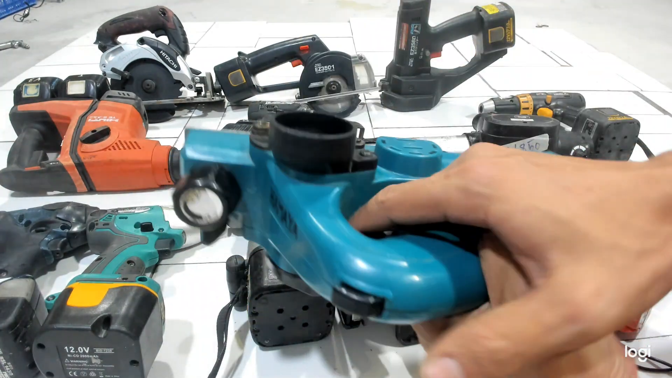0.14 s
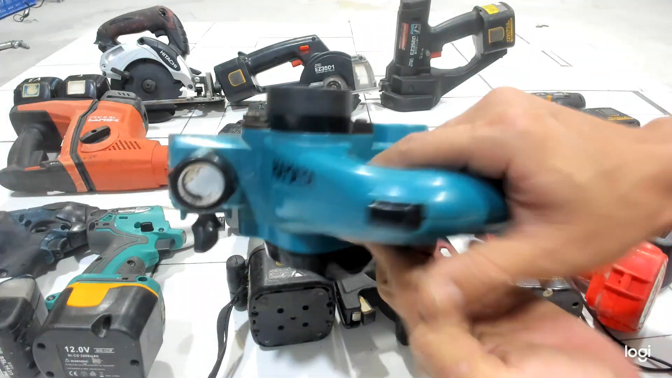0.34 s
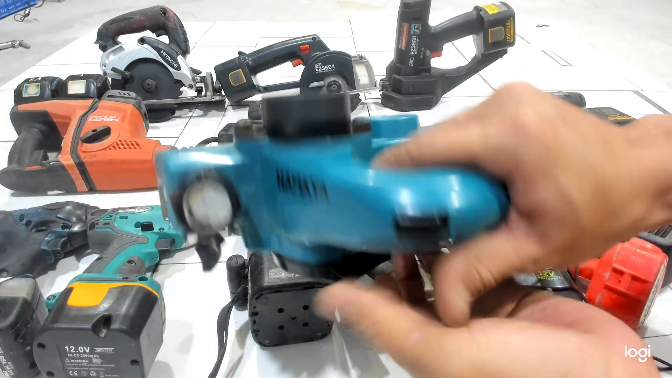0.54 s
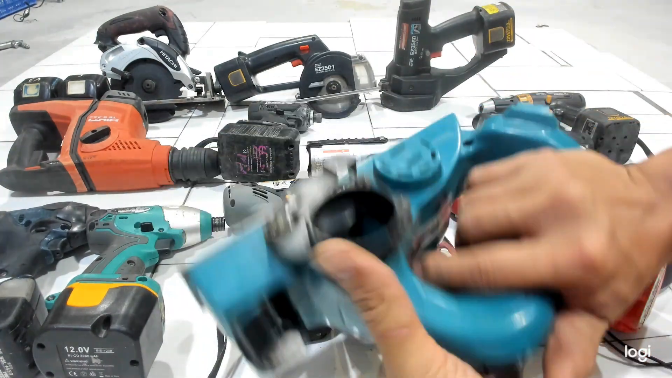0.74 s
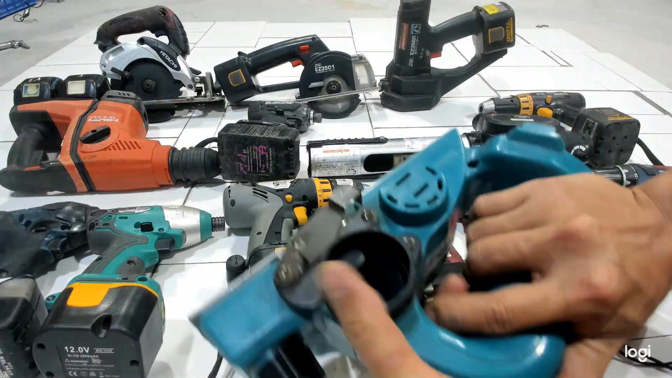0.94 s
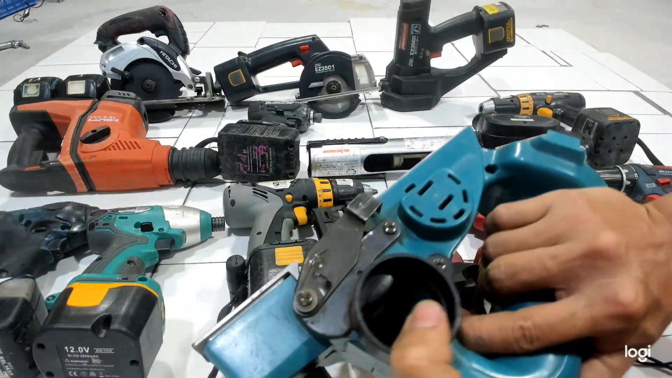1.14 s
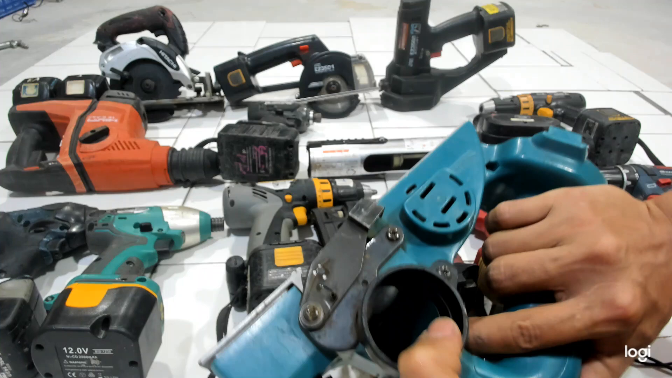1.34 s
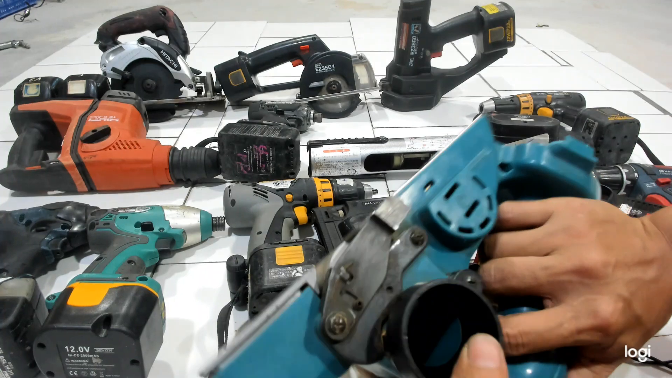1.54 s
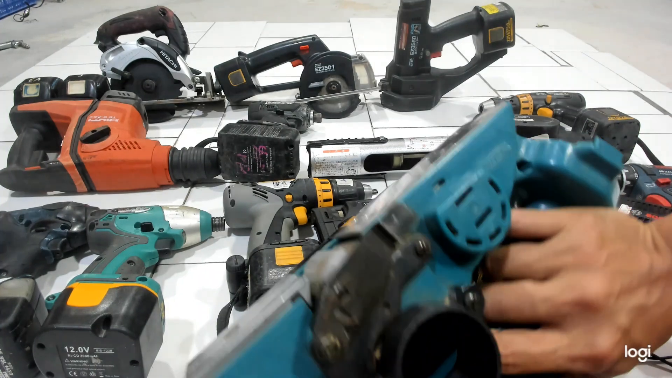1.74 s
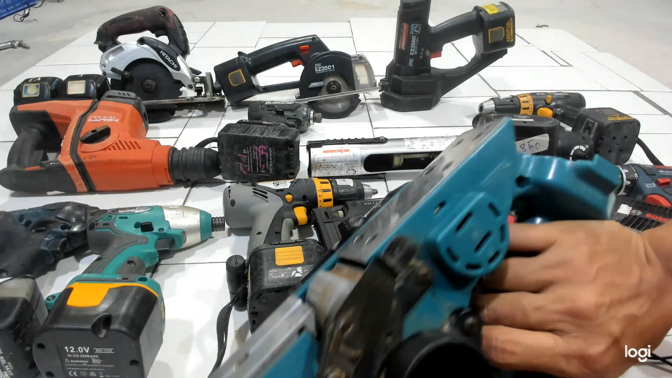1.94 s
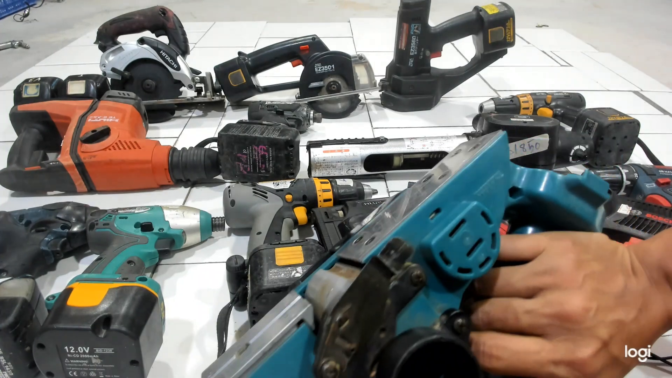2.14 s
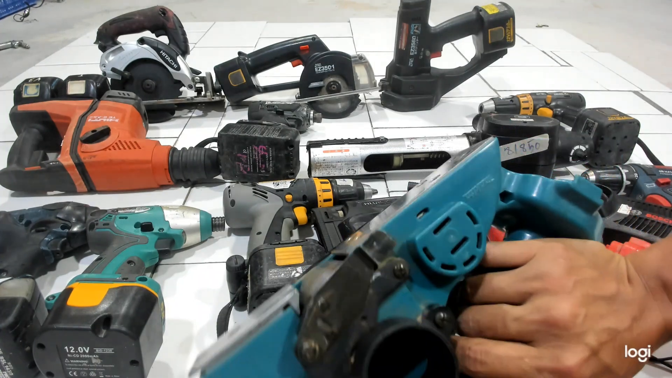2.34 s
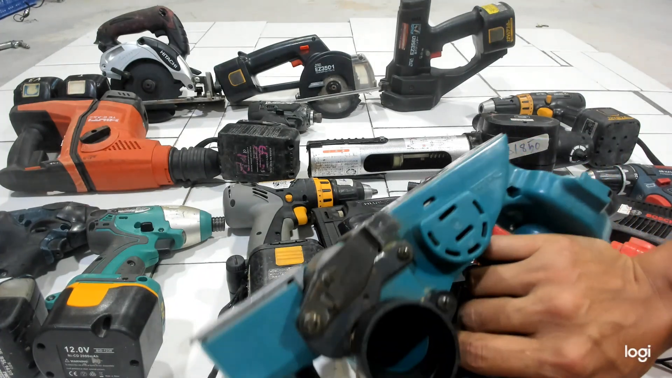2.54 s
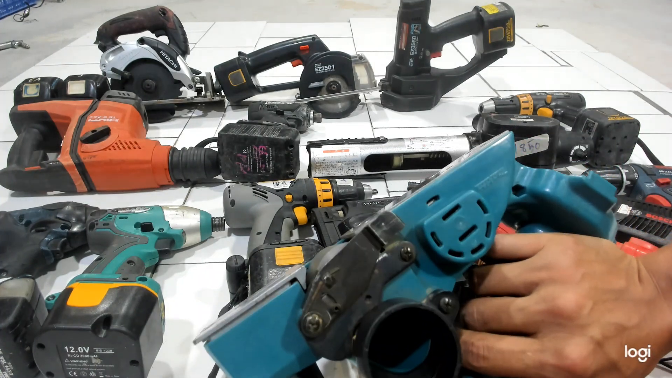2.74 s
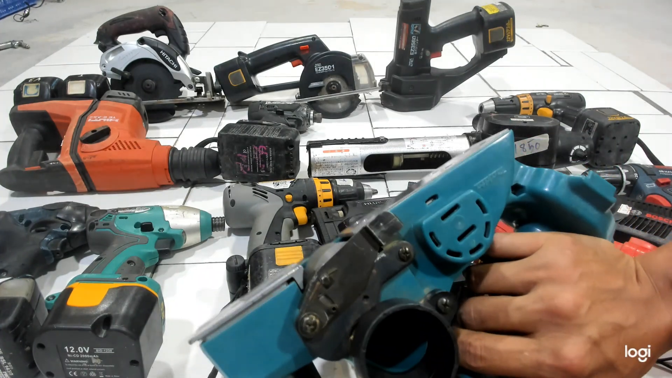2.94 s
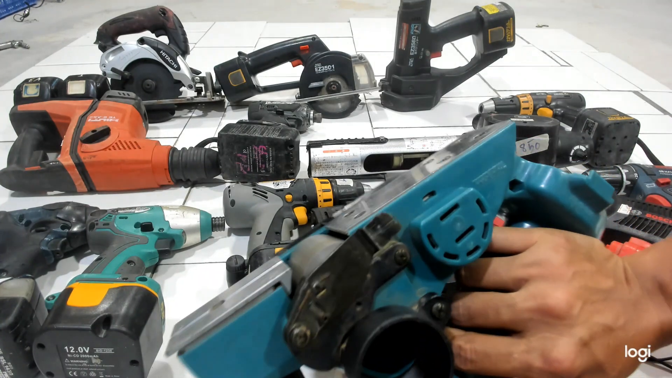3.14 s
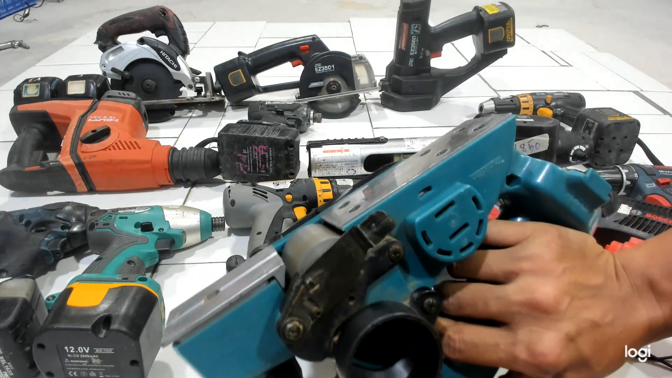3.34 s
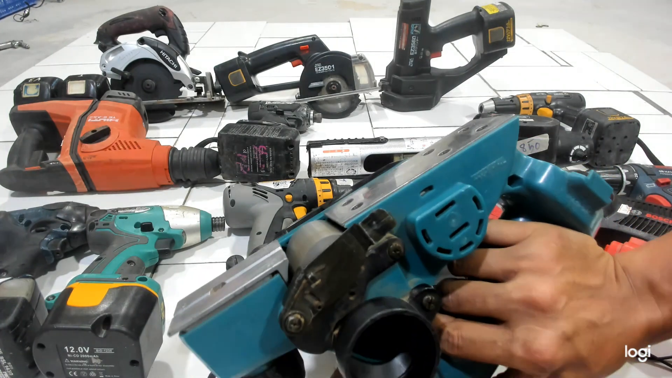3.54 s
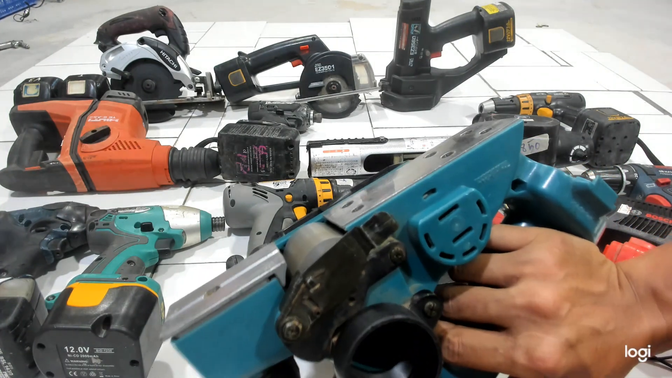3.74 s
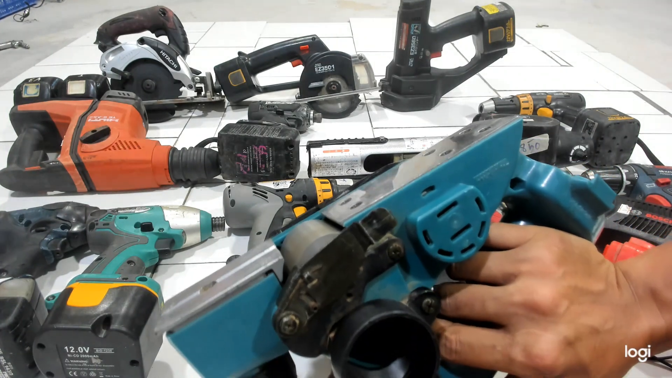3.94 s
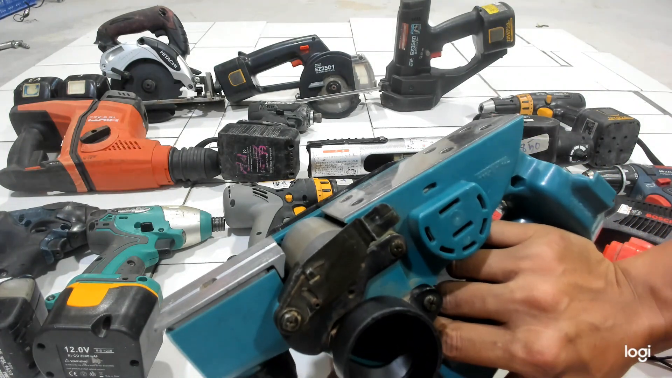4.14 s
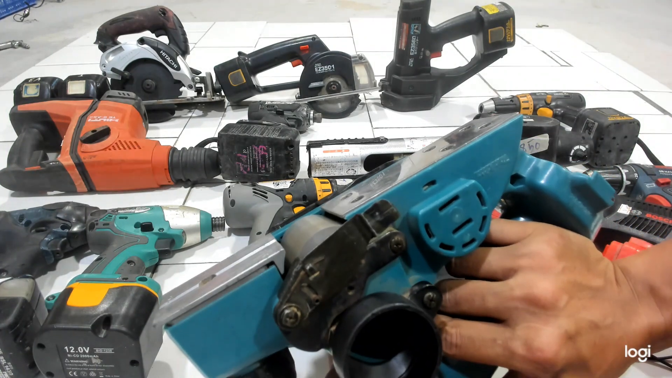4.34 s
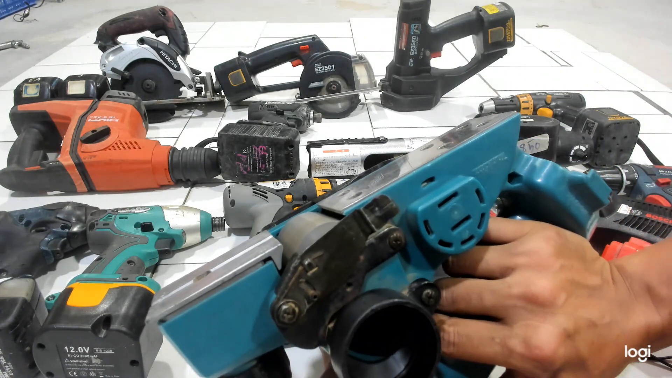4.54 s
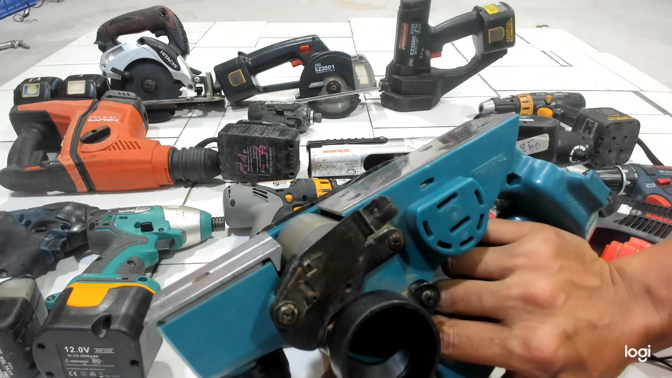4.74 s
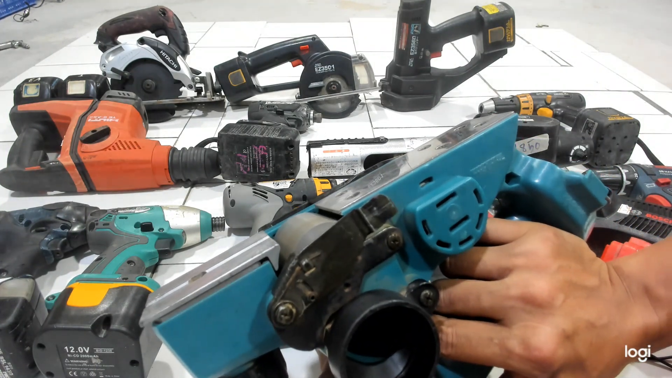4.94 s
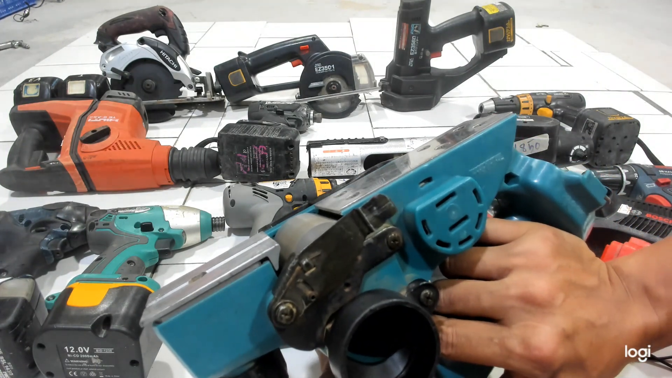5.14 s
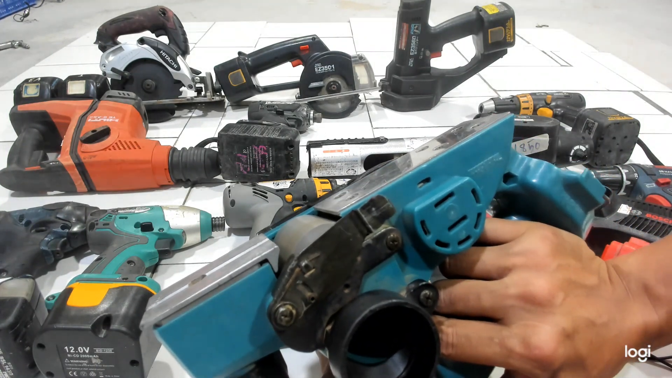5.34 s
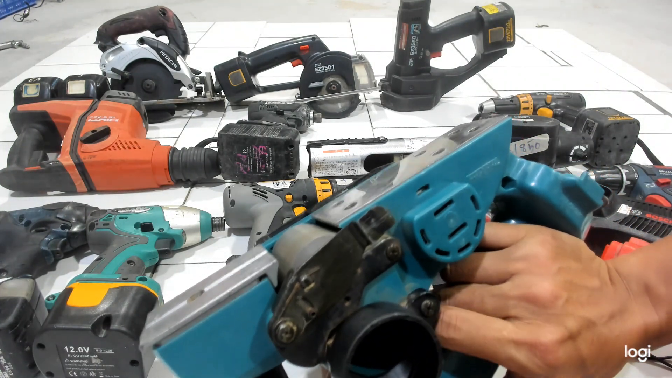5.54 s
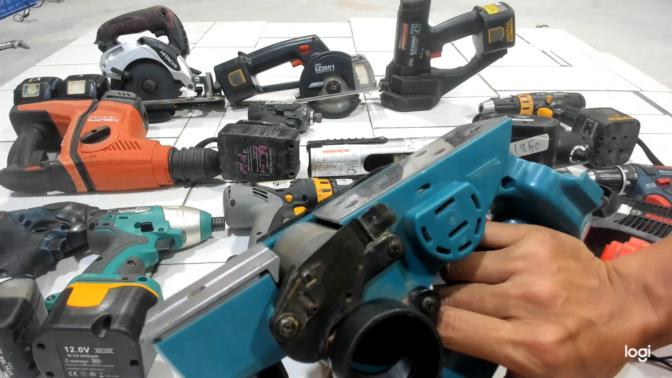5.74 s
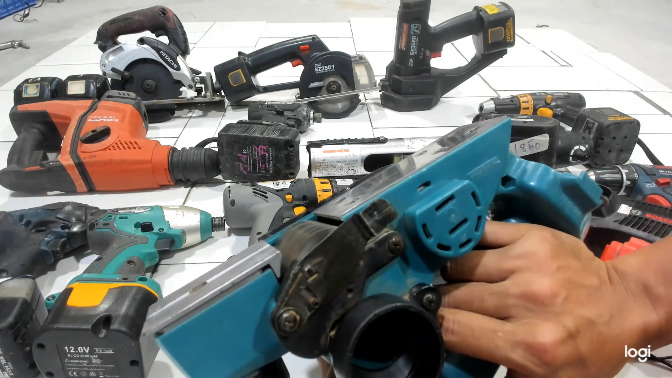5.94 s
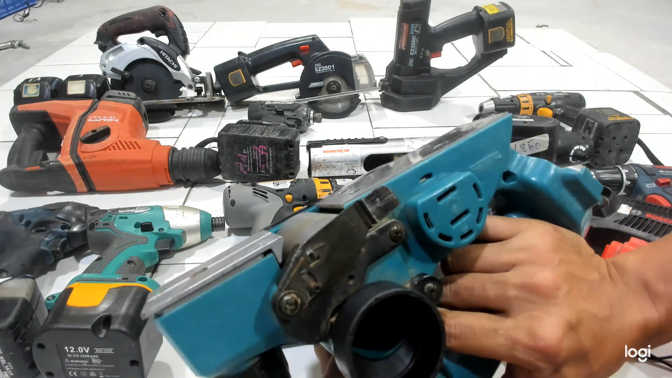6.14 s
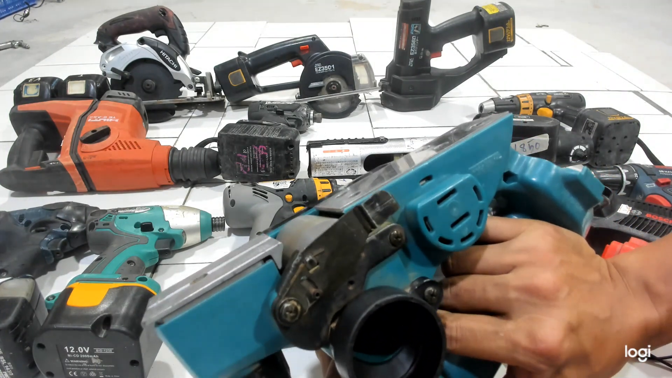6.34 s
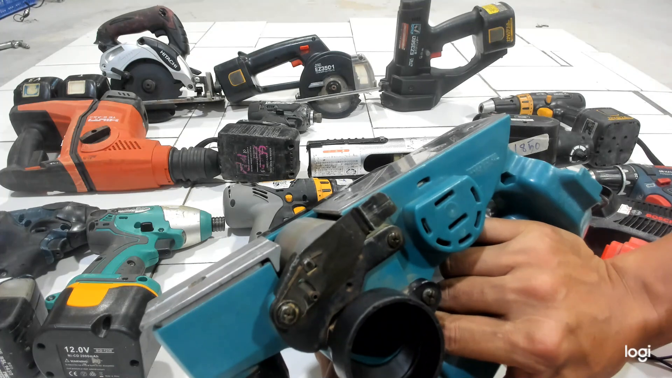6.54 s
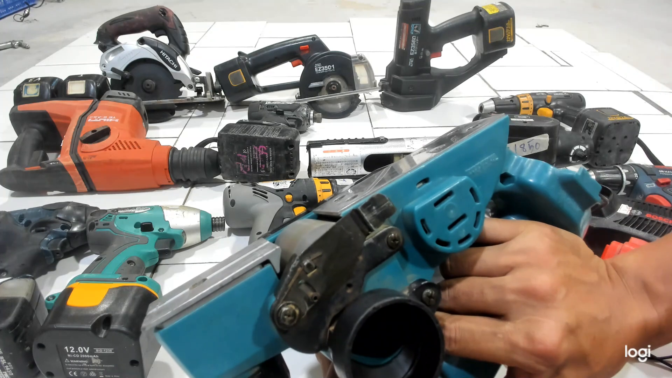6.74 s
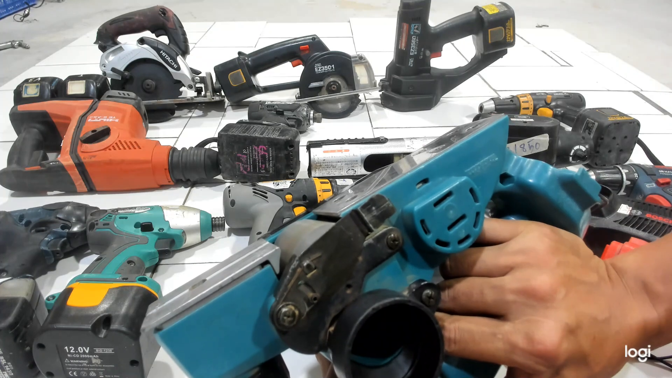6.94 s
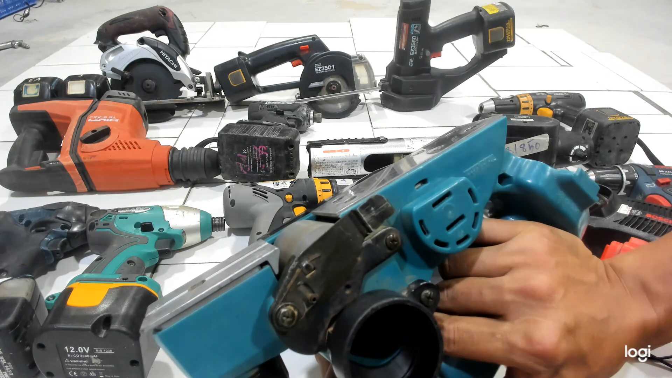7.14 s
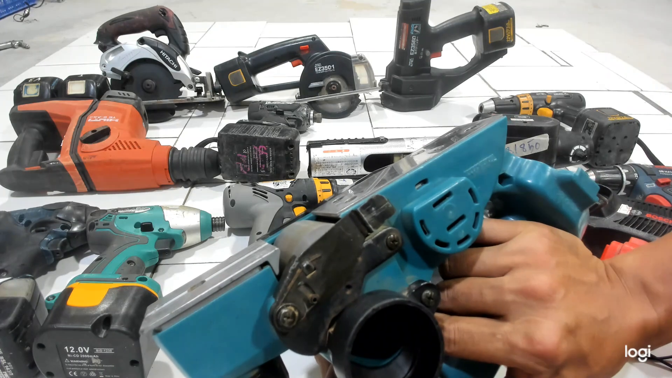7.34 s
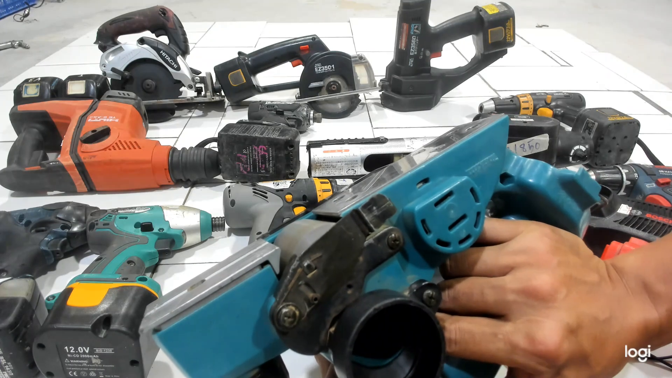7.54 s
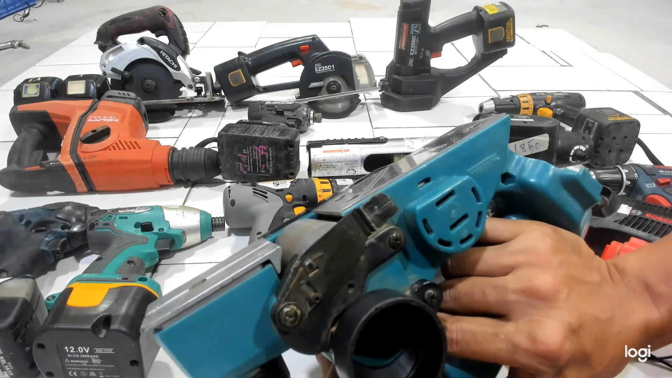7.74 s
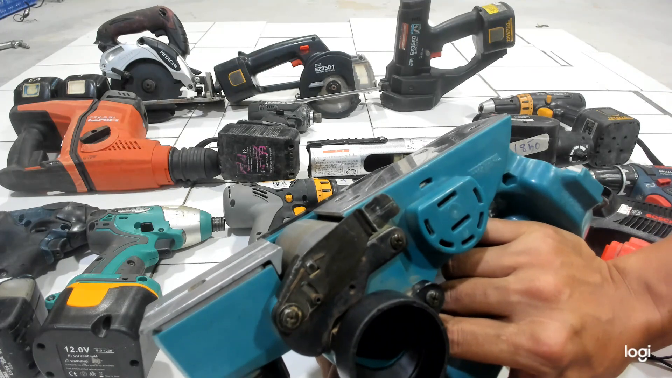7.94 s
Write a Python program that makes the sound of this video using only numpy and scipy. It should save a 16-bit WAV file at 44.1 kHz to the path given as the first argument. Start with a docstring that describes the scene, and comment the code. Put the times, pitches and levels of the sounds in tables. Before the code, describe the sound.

From 0 to 2.2 s a planer is handled close to the microphone: scattered hard plastic knocks and small ticks, strongest around 0.15 to 0.35 s, brief skin rubs and faint creaks, over a low, wavering workshop hum. At 2.37 s a crisp switch click starts the motor. Its rough growl climbs steeply, then more gradually, into a loud, dense, nasal whine by about 3.3 s, with gear-belt clatter and hissing fan air; air puffs thump the microphone around 2.7 to 3.2 s. The strained tone eases near 3.5 s and the whine holds, creeping slightly upward. At 5.4 s it is released and the pitch falls rapidly, rattling and fading. A bright click at 6.01 s starts a second run-up, settling by about 7 s into a slightly higher, steady whine, with small thumps at 6.8 and 7.5 s, still running at the end. Dry, short room reflections.

```python
"""Knocks, rubbing skin and creaking plastic come first, over a workshop's hum, as a cordless planer is handled.
It is then switched on twice and braked once: each time the pitch climbs along a saturating curve.
Motor, cutter drum and toothed belt add sine multiples of their turning rates; noise through the resonances
of the plastic housing makes the clatter, and coloured noise the fan air. Pressure pulses from the chip port
thump the microphone, and a limiter holds the peaks."""
import sys
import numpy as np
from scipy import signal
from scipy.fft import rfft, irfft
from scipy.io import wavfile
from scipy.ndimage import uniform_filter1d, minimum_filter1d

SR = 44100
rng = np.random.default_rng(int(sys.argv[2]) if len(sys.argv) > 2 else 0)


def store_wav(level_fs):
    """Save 16-bit WAV to argv[1]."""
    pcm = np.round(np.clip(np.atleast_2d(level_fs), -1, 1) * 32767)
    wavfile.write(sys.argv[1], SR, pcm.T.astype(np.int16))


N = 352800

# housing resonances: f/Hz, filter width/Hz, relative level/dB
HOUSING_MODES = [(655, 50, -3), (774, 265, -5), (926, 213, 0), (1264, 200, -3), (1521, 236, 3.5),
                 (1780, 680, -3), (2133, 410, -5.5), (2755, 390, -6), (3020, 330, -11), (3680, 720, -17)]
# trigger pulls: switched on t/s, released t/s, top speed/(turns/s), creep of that speed/(turns/s per s)
TRIGGER_PULLS = [(2.37, 5.416, 322.75, 2.58), (6.015, 9, 339.3, -.8)]
# per pull: motor stops straining t/s, upper multiple against the ripple table/dB,
# clatter base level/dB, fan air base level/dB
PULL_LEVELS = [(3.5, -2, -21.5, -15), (6.58, 2, -21, -14)]
SPIN_UP_S = .332  # time constant of the run-up


def planer():
    """Superposition: tones locked to the turning parts, housing clatter and fan air add as pressures."""
    # multiples of each part's turning rate: multiple, full-speed level/dB in pull 1, the same in pull 2
    rotor_lines = [(1, -40, -38), (2, -21.5, -22.5), (4, -33.5, -32), (7, -30.5, -45), (8, -30, -50),
                   (9, -30, -41), (14, -48, -37), (15, -26.5, -27.5), (16, -33.5, -35), (17, -27.5, -37),
                   (18, -49, -44), (21, -32, -32), (22, -48, -38), (24, -37.5, -33), (29, -32, -36),
                   (33, -34, -41), (34, -43, -52), (39, -36.5, -51), (45, -43, -56)]
    drum_lines = [(1, -46, -43), (2, -34, -34), (3, -25.5, -20.5), (4, -32.5, -33), (5, -22.5, -22),
                  (6, -27, -26), (7, -26, -25.5), (8, -37, -38.5), (9, -50, -52)]
    belt_lines = [(11, -31, -31), (12, -31, -36), (16, -36.5, -31), (18, -32.5, -28.5), (21, -32.5, -36),
                  (24, -30, -28), (26, -32.5, -24), (27, -25, -35), (29, -37, -41), (33, -41, -41),
                  (36, -34.5, -35), (41, -33, -52)]
    # lurches of the belt drive: t/s, extra clatter level/dB, extra air level/dB
    lurches = [(2.372, 0.5, 16), (2.405, -1, 7), (2.447, 4, 6), (2.62, 2, 6), (5.47, 8.5, 0),
               (5.635, 0.5, 6), (5.885, 7, 5), (6.018, 3, 15), (6.16, 2, 3), (6.218, 1, 5), (6.32, 4, -3)]
    lurch_s = .014
    motor_teeth, drum_teeth, belt_teeth = 15, 16, 75

    speed, strain, braking, pull, on = motor()
    turns = np.cumsum(speed) / SR
    share = speed / np.transpose(TRIGGER_PULLS)[2, pull]
    lurch_db, lurch_air_db = sum(np.outer([clatter_db, air_db], bump(s, lurch_s / 2, lurch_s))
                                 for s, clatter_db, air_db in lurches)

    lines = torque_ripple(speed, turns, share, strain, braking, pull)
    lines = lines + tones(speed, turns, rotor_lines, 1, waver_db=1.4)
    lines = lines + tones(speed, turns, drum_lines, motor_teeth / drum_teeth, waver_db=1.93)
    lines = lines + tones(speed, turns, belt_lines, motor_teeth / belt_teeth, waver_db=3.0)
    rattle = housing_clatter(speed, turns, share, strain, braking, pull, on, motor_teeth, lurch_db)
    return on * lines + rattle + on * fan_air(turns, share, braking, pull, lurch_air_db)


def motor():
    """Rotational dynamics: fan drag bends the run-up into a tanh; the brake weakens with speed, friction ends it.

    Returns speed (turns/s), strain (0-1), braking, number of the pull and whether the rotor turns."""
    head_start_s, ease_s = .016, .12
    brake_s, friction_turns, crawl_turns = .364, 93, 11  # time constant/s, then turns/s
    s = np.arange(N) / SR
    pull = (s > TRIGGER_PULLS[1][0]).astype(int)
    start, release, top, creep = np.transpose(TRIGGER_PULLS)[:, pull]
    driven = np.clip(s, start, release) - start
    speed = (top + creep * driven) * np.tanh((driven + head_start_s) / SPIN_UP_S)
    braking = s > release
    speed = (speed + friction_turns) * np.exp(braking * (release - s) / brake_s) - friction_turns
    eased = np.transpose(PULL_LEVELS)[0, pull]
    strain = np.maximum(np.clip(.5 + (eased - s) / ease_s, 0, 1), braking)
    return np.maximum(speed, crawl_turns), strain, braking, pull, (s > start) & (speed > crawl_turns)


def torque_ripple(speed, turns, share, strain, braking, pull):
    """Periodic torque gives multiples of the turning rate, whose levels depend on speed and strain."""
    # ripple under strain: speed/(turns/s), then level/dB of the 3rd, 6th, 5th and upper multiple
    ripple_table = [(40, -60, -51, -64, -70), (100, -50, -30, -51, -60), (135, -31.5, -18, -44, -50),
                    (209, -21.5, -21, -36, -42), (257, -16.5, -15, -34, -34), (286, -16, -17.5, -28, -30),
                    (302, -4.5, -14, -26, -15), (307.3, -13, -22, -20, -23), (324, -13.5, -36, -15.5, -34)]
    # the same four multiples without strain: level/dB
    eased_levels = (-28, -29, -25.5, -39)
    # braked, against the table: level/dB
    braked_shifts = (0.5, -6.5, -16, -8)
    # braked, further shift by the time the speed is zero: level/dB
    brake_fades = (-16, 4, 0, -10)
    # number of the upper multiple in each pull
    upper_multiple = (7, 9)
    full_brake_turns = 300  # turns/s; braked ripple above this speed is as at this speed
    flutter_db, flutter_rad = 16, 1.4  # the ripple breaks up and wavers the more, the slower the motor
    hold_fade = -6  # dB/s; ripple sinks while the strain lasts at speed

    at, *strained_levels = np.transpose(ripple_table)
    look_up = np.where(braking, np.minimum(speed, full_brake_turns), speed)
    since = np.arange(N) / SR - np.transpose(TRIGGER_PULLS)[0, pull]
    fade_db = ~braking * hold_fade * np.maximum(since - 2 * SPIN_UP_S, 0)
    slow = np.clip(1 - share, 0, 1) ** 2
    levels = []
    for strained, eased, braked, brake_fade in zip(strained_levels, eased_levels, braked_shifts, brake_fades):
        loaded = np.interp(look_up, at, strained) + braking * (braked + brake_fade * (1 - share)) + fade_db
        levels.append(eased + strain * (loaded - eased) - flutter_db * slow * abs(walk(25)))
    third_db, sixth_db, fifth_db, upper_db = levels
    upper_db = upper_db + np.transpose(PULL_LEVELS)[1, pull]

    third = 2 * np.pi * 3 * turns + flutter_rad * slow * walk(40)  # phase in rad
    ripple = undb(third_db + 0.86 * walk(25)) * np.sin(third)
    ripple += undb(sixth_db + 0.95 * walk(35)) * np.sin(2 * third)
    ripple += undb(upper_db + 2.5 * walk(20)) * np.sin(third * np.take(upper_multiple, pull) / 3)
    ripple += undb(fifth_db + 2.2 * walk(8)) * np.sin(2 * np.pi * 5 * turns)
    return np.sqrt(2) * ripple


def tones(speed, turns, rows, ratio, waver_db):
    """Order tones: multiples of one part grow with speed and swell as they cross the housing resonances."""
    step = 64  # samples between level updates
    slow, second = speed[::step], np.arange(0, N, step) / SR > 6
    full = np.where(second, 338, 329)  # turns/s at which the listed levels hold
    out = 0
    for k, first_db, second_db in rows:
        order = k * ratio  # cycles per motor turn
        db = np.where(second, second_db, first_db) + (85 + 5 * order) * np.log10(slow / full)
        db = db + np.minimum(2.0 * (housing_db(order * slow) - housing_db(order * full)), 2.5)
        gain = np.repeat(undb(db), step)[:N] * undb(waver_db * walk(9))
        wobble = .012 * walk(30) * (1 + order / 12)  # cycles
        out = out + gain * np.sin(2 * np.pi * (order * turns + rng.random() + wobble))
    return np.sqrt(2) * out


def housing_db(hz):
    """Modal radiation: the powers of the resonance curves sum to how readily the housing radiates."""
    power = sum(undb(2 * db) / (1 + (2 * (hz - f) / w) ** 2) for f, w, db in HOUSING_MODES)
    return 10 * np.log10(power)


def housing_clatter(speed, turns, share, strain, braking, pull, on, motor_teeth, lurch_db):
    """Forced resonance: uneven belt-tooth blows scale noise that excites the housing modes."""
    strain_db = 1  # clatter rises while pulling
    boom_slow_db, boom_fast_db = 5.5, -1.5  # modes below 1 kHz against the rest, at rest and at full speed
    dying_turns, dying_db_per_decade = 140, 23.5  # below this braked speed (turns/s) the clatter fades

    db = np.transpose(PULL_LEVELS)[2, pull] + strain_db * strain * ~braking + lurch_db
    db = db + braking * dying_db_per_decade * np.log10(np.minimum(speed / dying_turns, 1))
    low_db = boom_slow_db + (boom_fast_db - boom_slow_db) * share

    # every belt tooth lands with its own force; a slack belt at low speed throbs once a motor turn
    tooth = (turns * motor_teeth).astype(int)
    spread_db = np.clip(speed / 50, 1, 2.4)
    force = undb(spread_db * rng.standard_normal(tooth[-1] + 1)[tooth])
    throb_depth = np.clip(1 - speed / 300, .1, .3)
    throb = np.exp(throb_depth * np.cos(2 * np.pi * turns + .6 * walk(30)))
    shake = on * force * throb

    clatter = 0
    for f, w, mode_db in HOUSING_MODES:
        gain = undb(mode_db + (f < 1000) * low_db + 2.0 * walk(20))
        clatter = clatter + gain * ring(ring(shake * rng.standard_normal(N), f, w), f, w)
    return undb(db) * band_level(clatter, 933, 1511)


def fan_air(turns, share, braking, pull, lurch_air_db):
    """Flow noise: broadband turbulence follows a power law of speed, chopped a little once a turn."""
    # fan air spectrum: f/Hz, relative level per Hz/dB
    air_tone = [(1410, -20), (2400, -10), (2700, -0.5), (4100, -4), (4770, 1.5), (5410, 0.5), (6230, -3.5),
                (7010, -4), (10900, -12), (11700, -14), (13000, -13.5), (15800, -19.5)]
    draught_tone = [(20, -2), (60, 4), (130, -4.0), (250, 3), (500, 12), (700, -5)]  # same columns
    driven_db_per_decade, braked_db_per_decade, braked_db = 22, 27.5, -2.5

    db = np.transpose(PULL_LEVELS)[3, pull] + lurch_air_db + braking * braked_db
    db = db + np.where(braking, braked_db_per_decade, driven_db_per_decade) * np.log10(share)
    chop = 1 + 0.049 * np.cos(2 * np.pi * turns + .8)
    air = colour(rng.standard_normal(N), air_tone) * chop * undb(0.91 * walk(40))
    draught = colour(rng.standard_normal(N), draught_tone) * undb(1.1 * walk(12))
    return undb(db) * (band_level(air, 2800, 12000) + level(draught, -21.0))


def hands():
    """Impact and friction excitation: decaying bursts knock the shell; steady noise rubs and creaks it."""
    # knocks of hand and switch: t/s, body peak level/dB, centre f/Hz, burst t60/s, tick against body level/dB
    knocks = [(.114, -32, 3000, .05, 0), (0.156, -17.5, 3530, 0.038, 7), (.160, -31, 3000, 0.033, 0),
              (.170, -25, 3000, .02, 0), (.289, -16, 1340, 0.056, -21), (.342, -24.5, 5000, 0.042, 0),
              (.351, -23.5, 1220, 0.075, -12), (.667, -24, 4100, 0.044, -22), (0.829, -34, 3500, .04, -7),
              (0.97, -22, 2420, 0.081, -10), (1.127, -29, 1290, .05, -25), (1.27, -24, 1340, .08, -4),
              (1.612, -27, 1400, .06, -6), (1.622, -31, 1700, 0.073, -9), (1.673, -26, 3700, 0.033, -10),
              (1.677, -26, 1480, 0.035, -20), (1.750, -32, 1410, .05, -20), (1.837, -29, 2300, .05, -19),
              (2.189, -21.5, 2950, 0.033, -24), (2.3693, -7, 7200, 0.011, 0),
              (6.012, -17.5, 6000, .04, 8.5)]
    # skin rubbing on plastic: loudest moment t/s, level/dB, rise/s, fall/s
    rubs = [(.155, -40, .04, 0.063), (.36, -35.5, 0.013, 0.04), (.5, -51, .05, 0.066),
            (1.275, -42, 0.045, .03), (1.625, -41, .012, .014), (1.9, -49, 0.22, .3)]
    # spectrum of the rubbing: f/Hz, relative level per Hz/dB
    rub_tone = [(700, -13), (1500, -6), (3000, -1.5), (7000, -1), (15000, -20)]
    # resonances woken in patches by creeping fingers: f/Hz, filter width/Hz, level before wavering/dB
    creak_modes = [(1142, 350, -48), (1590, 470, -54.5), (2260, 200, -59), (2770, 340, -55),
                   (3730, 820, -61.5), (4780, 460, -59), (6960, 650, -76)]
    rub_idle_db = -77.5

    rub = undb(rub_idle_db) + sum(undb(db) * bump(s, rise, fall) for s, db, rise, fall in rubs)
    skin = band_level(colour(rng.standard_normal(N), rub_tone), 4100, 14000)
    out = rub * undb(3.8 * walk(60.1)) * skin
    for hz, width, db in creak_modes:
        creak = ring(ring(rng.standard_normal(N), hz, width), hz, width)
        out += undb(4.5 * walk(22)) * level(creak, db)
    out *= np.clip((2.2 - np.arange(N) / SR) / 0.63, 0, 1)  # the grip settles

    t = np.arange(SR // 5) / SR
    for s, db, hz, t60, tick_db in knocks:
        burst = rng.standard_normal(len(t)) * np.exp(-np.log(1000) * t / t60)
        body = ring(ring(burst, hz, 0.21 * hz), hz, 2.8 * hz)
        tick = ring(burst, 6100, 4600)
        knock = body / abs(body).max() + undb(tick_db) * tick / abs(tick).max()
        i = int(s * SR)
        out[i:i + len(t)] += undb(db) * knock
    return out


def gusts():
    """Pressure pulse: each gust is a dip on the membrane flanked by two smaller swells."""
    # gusts on the microphone: t/s, dip level/dB, time scale/s (the dip lies one time scale after t)
    puffs = [(2.736, -11.5, 0.001), (2.75, -26, 0.0026), (2.787, -24, 0.0032), (2.824, -26, 0.0029),
             (2.942, -17, 0.0015), (2.964, -15, 0.0018), (2.984, -18, 0.0025), (3.009, -25, 0.0025),
             (3.114, -24, 0.0021), (3.146, -18, 0.0021), (5.179, -27, 0.0025), (6.836, -20, 0.0023),
             (7.489, -25, 0.0025)]
    out, t = np.zeros(N), np.arange(N) / SR
    for s, db, length in puffs:
        u = (t - s - length) / length
        out += undb(db) * (u ** 2 * 1.3 - 1) * np.exp(-u ** 2)
    return out


def shop():
    """Filtered noise: wavering bands, hum and breathy lines share a background level that is lower from 2.4 s."""
    # background spectrum: f/Hz, relative level per Hz/dB
    wash_tone = [(18, -46), (30, -10.5), (353, 3.5), (483, -3), (537, 0.5), (860, -6), (1120, -7),
                 (2730, -9.5), (3830, -17), (4730, -14), (15800, -31)]
    # course of the background level: t/s, level/dB
    background_course = [(0.0, -40.5), (1.71, -40), (2.15, -42.5), (2.36, -42.5)]
    # hum, first the mains sine, then the breathy lines: f/Hz, level at the start/dB
    hum_lines = [(59.2, -58.5), (134.6, -51.5), (274.5, -55.5), (344.5, -50.5), (543.7, -51.5), (1109, -56)]

    s, course_db = np.transpose([*background_course, (2.4, -49)])
    db = np.interp(np.arange(N) / SR, s, course_db)
    wash, swell = colour(rng.standard_normal(N), wash_tone), walk(2.87)
    bands = 0
    for hz in 40 * 2. ** np.arange(0, 8.6, .75):
        bands = bands + undb(1.8 * swell + 0.94 * walk(8.03)) * ring(wash, hz, 1.8 * hz)
    mains_hz, mains_db = hum_lines[0]
    hum = level(np.sin(2 * np.pi * mains_hz * np.arange(N) / SR), mains_db)
    for hz, hum_db in hum_lines[1:]:
        hum = hum + level(ring(ring(rng.standard_normal(N), hz, 12), hz, 12), hum_db)
    return undb(db) * (band_level(bands, 100, 3000) + hum / undb(db[0]))


def undb(db):
    """Decibel definition: 20 dB for each factor of ten in amplitude."""
    return 10 ** (np.asarray(db) / 20)


def level(x, db):
    """Effective value: scale x to an rms level in dB."""
    return x * undb(db) / np.sqrt(np.mean(x ** 2))


def band_level(x, lo_hz, hi_hz):
    """Parseval's theorem: scale x to rms 1 within a band."""
    power = abs(rfft(x)[int(lo_hz * N / SR):int(hi_hz * N / SR)]) ** 2
    return x * N / np.sqrt(2 * power.sum())


def colour(x, points):
    """Spectral shaping: weight x by (f/Hz, level/dB) points along log frequency."""
    hz, db = np.transpose(points)
    f = np.log(np.arange(len(x) // 2 + 1) * SR / len(x) + 1)
    return irfft(rfft(x) * undb(np.interp(f, np.log(hz), db)), len(x))


def ring(x, hz, width):
    """Damped resonator: a second-order peak at hz with a bandwidth in Hz."""
    return signal.lfilter(*signal.iirpeak(hz, hz / width, fs=SR), x)


def walk(rate):
    """Slow random modulation: levels held 1 / rate s and smoothed twice; spread near 1."""
    k = int(SR / rate)
    steps = np.repeat(rng.standard_normal(N // k + 1), k)
    return 1.39 * uniform_filter1d(uniform_filter1d(steps, k), k)[:N]


def bump(s, rise, fall):
    """Gaussian envelope: a soft swell that peaks at s, with its own rise and fall in seconds."""
    t = np.arange(N) / SR - s
    return np.exp(-(t / np.where(t < 0, rise, fall)) ** 2)


def scene():
    """Direct and diffuse sound: the tool and hands also excite a short room decay; both channels are equal."""
    near = planer() + hands()
    t = np.arange(SR // 4) / SR
    room = rng.standard_normal(len(t)) * np.exp(-np.log(1000) * t / 0.12) * (t > .004)  # t60 0.12 s
    wet = signal.fftconvolve(near, room / np.sqrt(np.sum(room ** 2)))[:N]
    mono = near + undb(-13.5) * wet + gusts() + shop()
    return np.array([mono, mono])


def record(dry):
    """Gain reduction and band limiting: a quick limiter holds peaks, the top is cut, the converter clips."""
    top_hz = 15750
    gain = minimum_filter1d(.97 / np.maximum(abs(dry), .97), size=121)
    held = dry * uniform_filter1d(gain, size=133)
    low_pass = signal.ellip(10, .2, 60, top_hz, fs=SR, output="sos")
    return np.clip(signal.sosfilt(low_pass, held), -1, 1)


dry = scene()
out = record(dry)
store_wav(out)
```